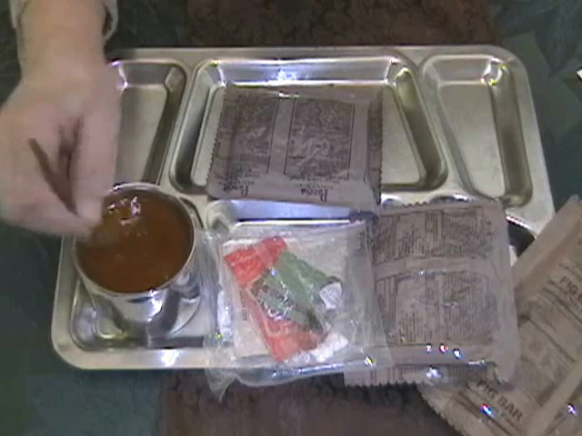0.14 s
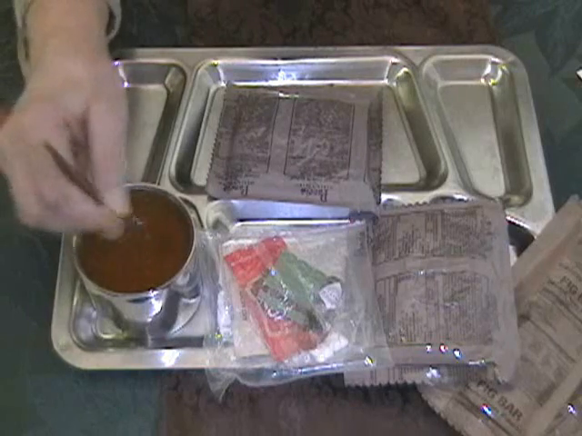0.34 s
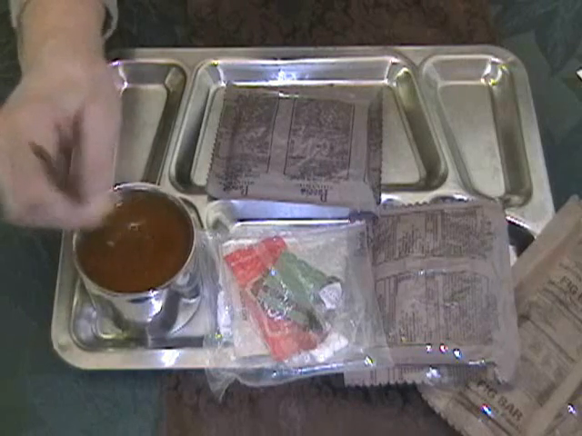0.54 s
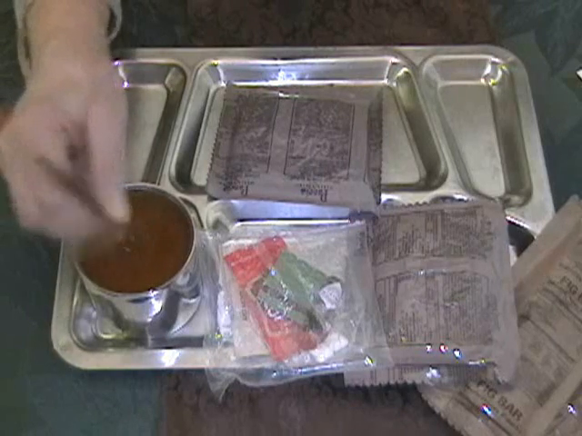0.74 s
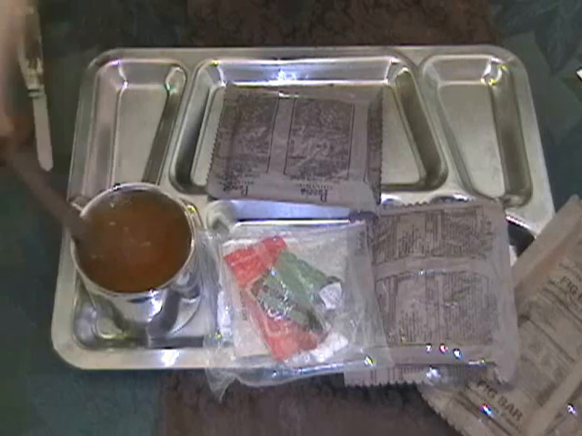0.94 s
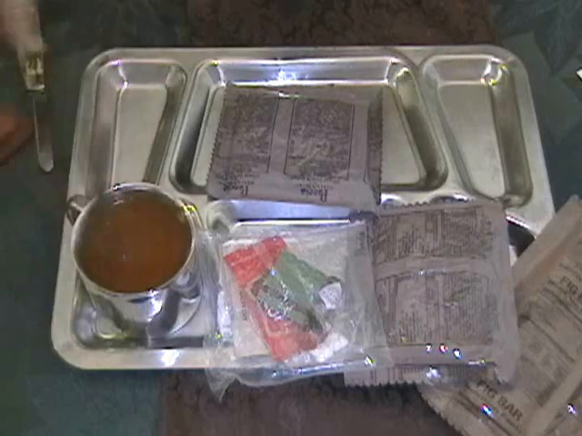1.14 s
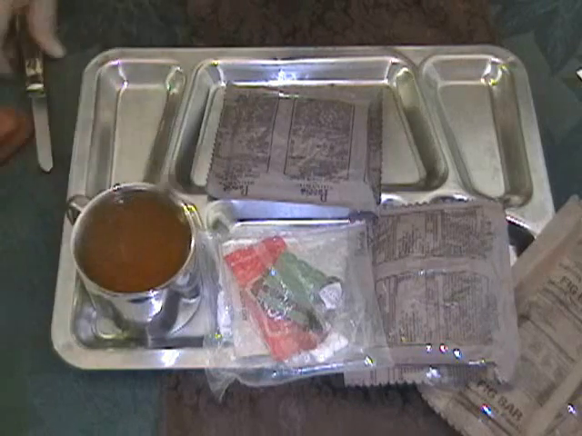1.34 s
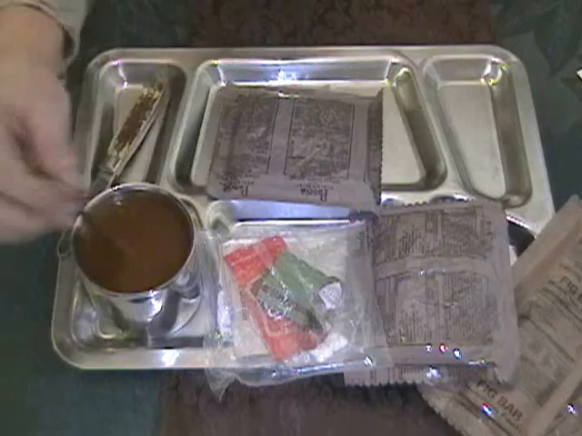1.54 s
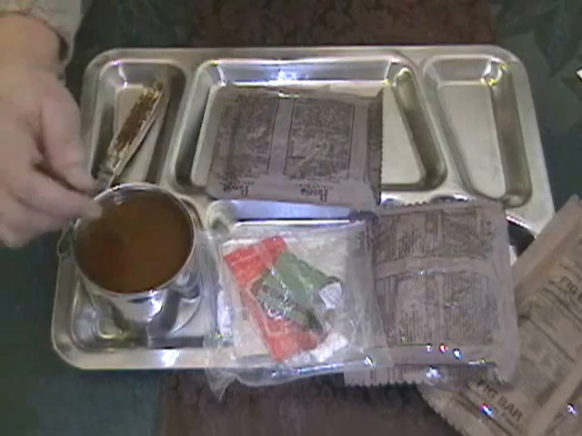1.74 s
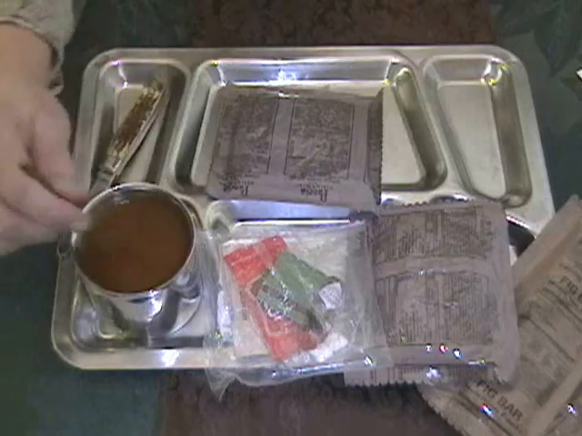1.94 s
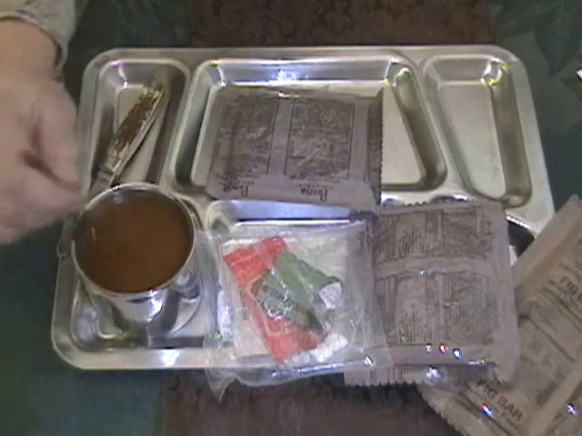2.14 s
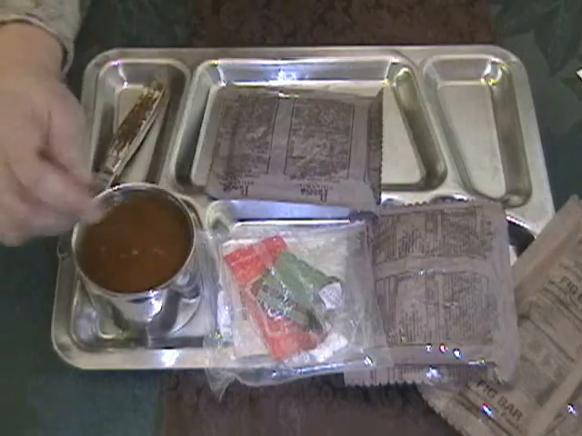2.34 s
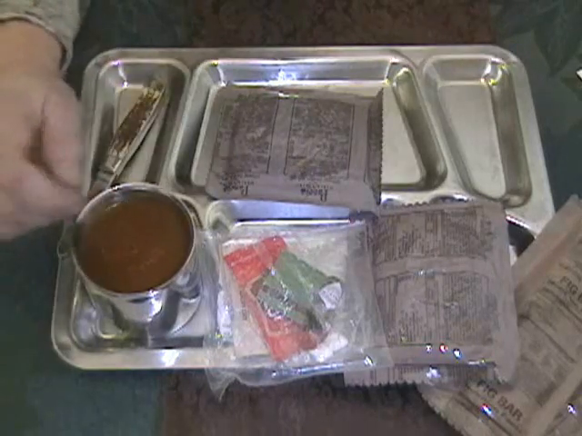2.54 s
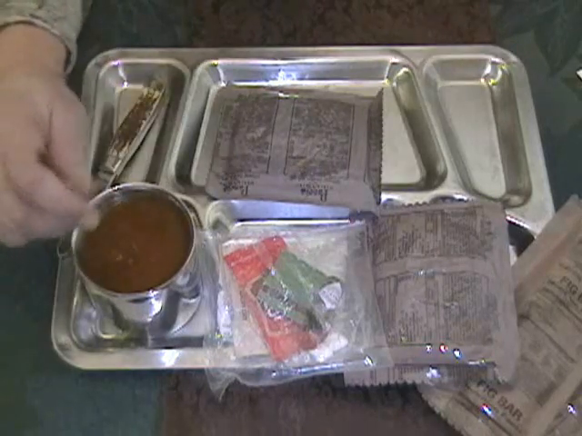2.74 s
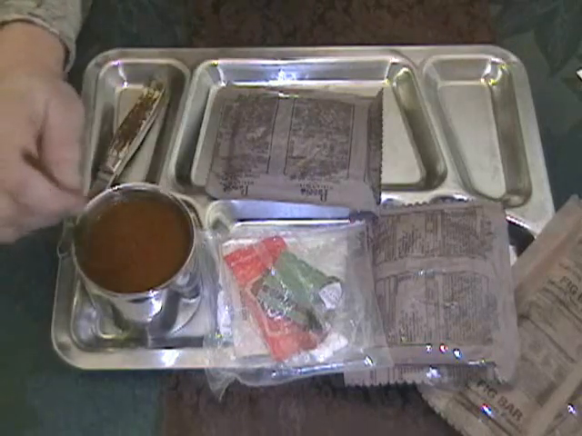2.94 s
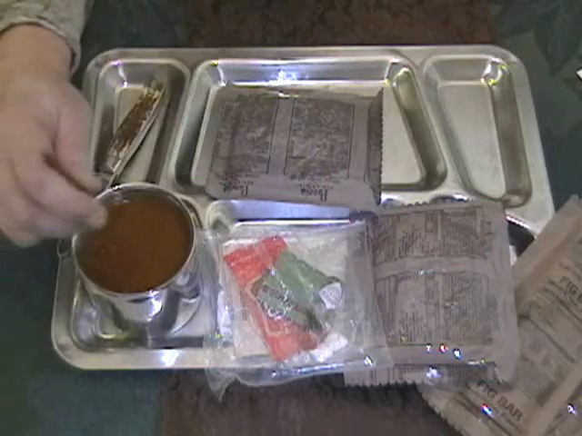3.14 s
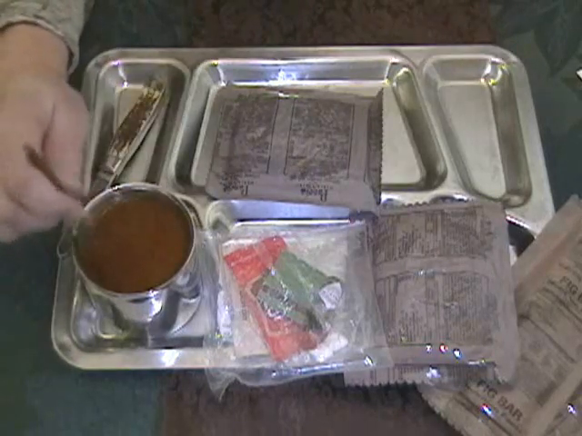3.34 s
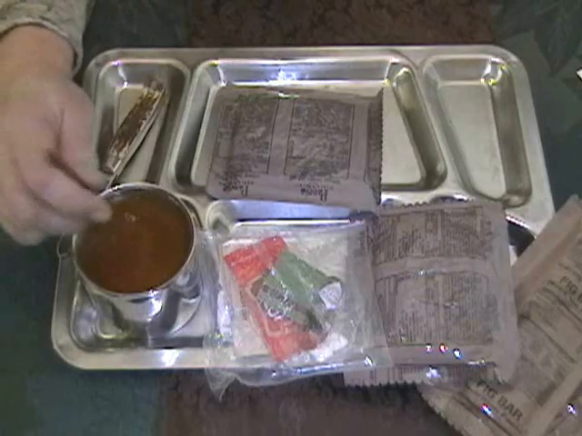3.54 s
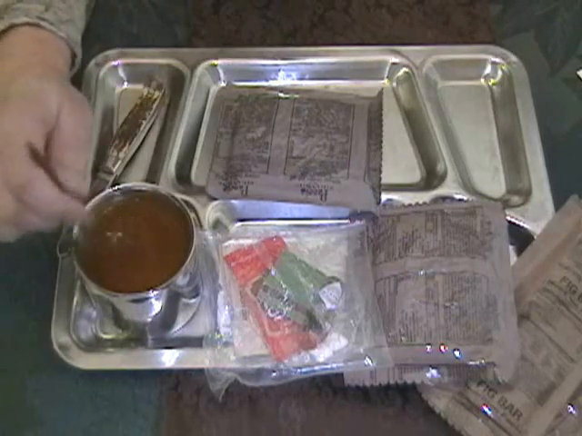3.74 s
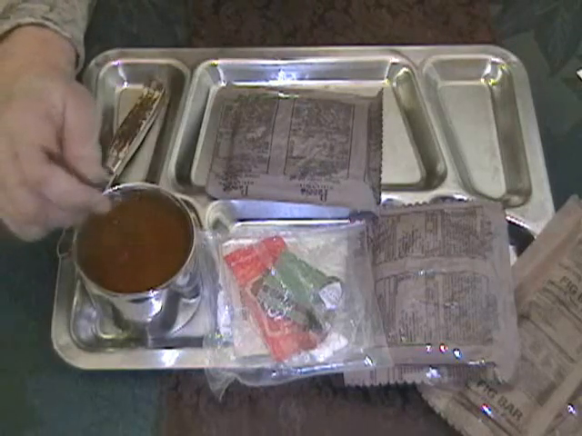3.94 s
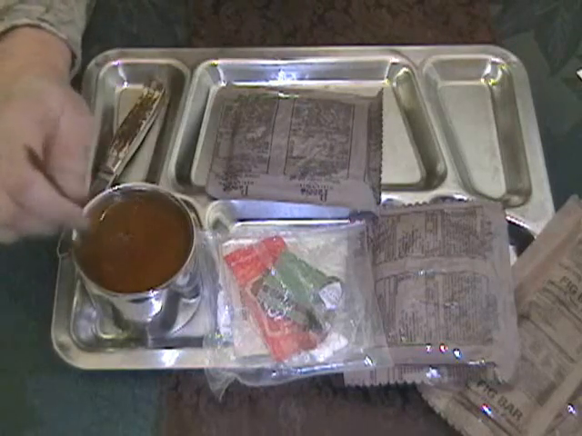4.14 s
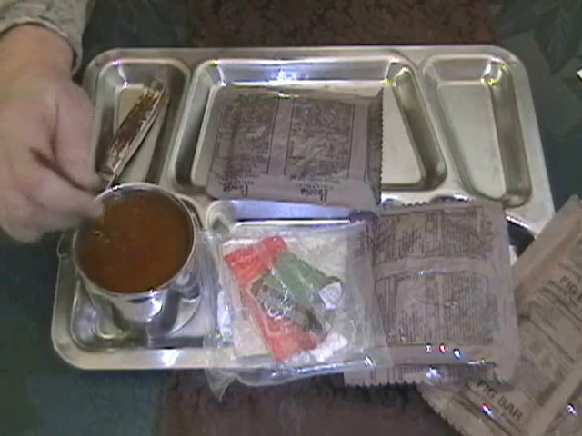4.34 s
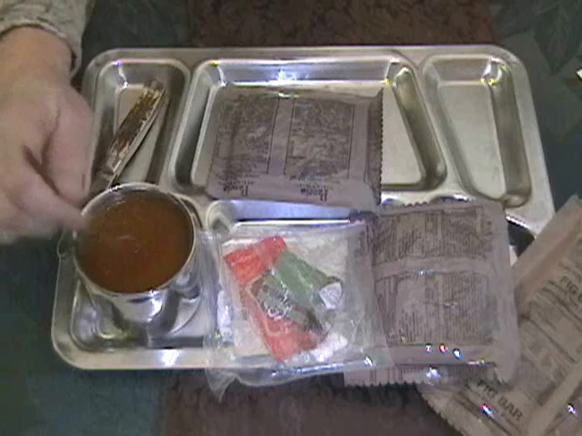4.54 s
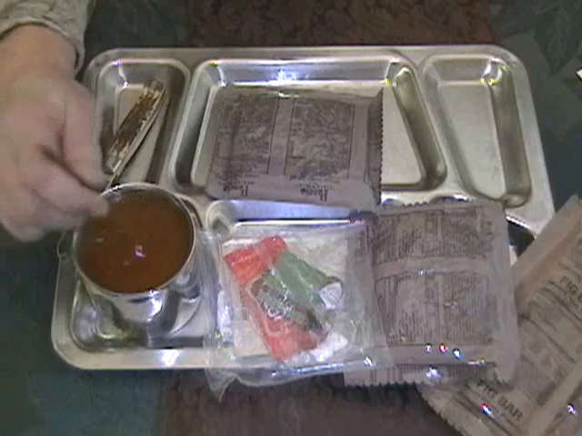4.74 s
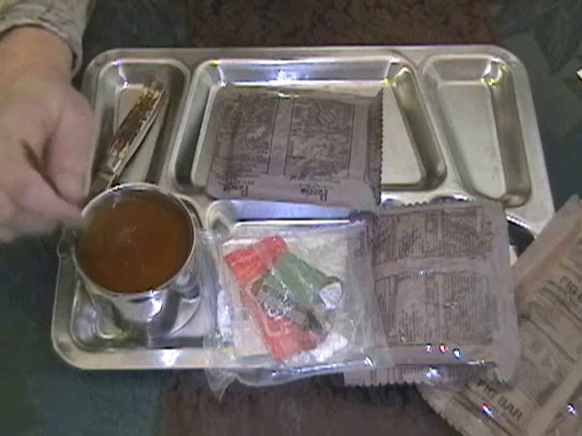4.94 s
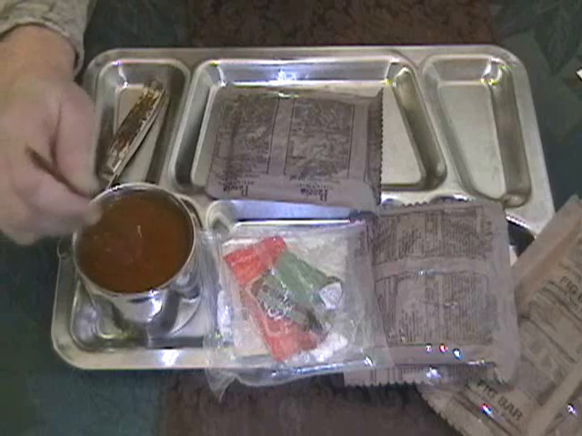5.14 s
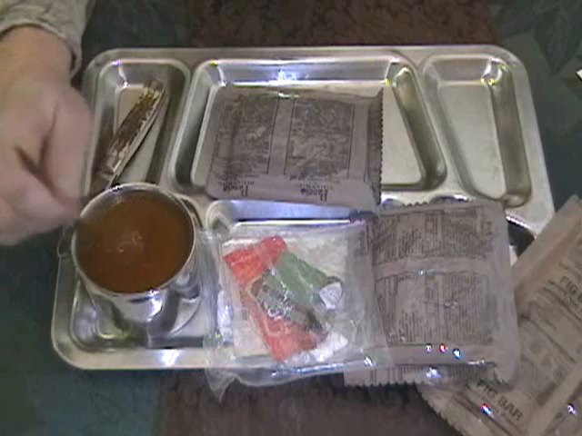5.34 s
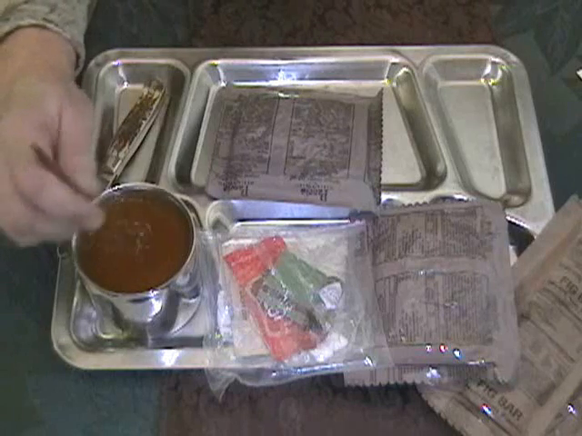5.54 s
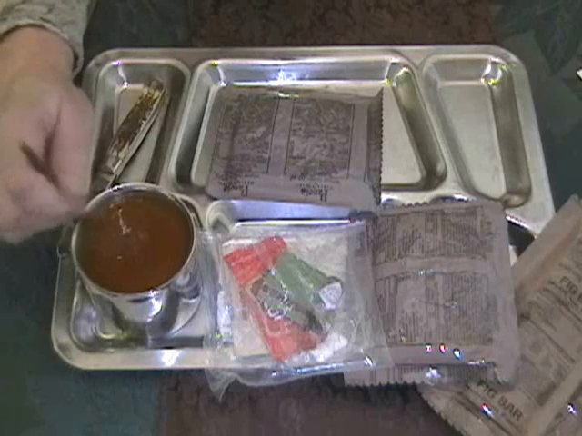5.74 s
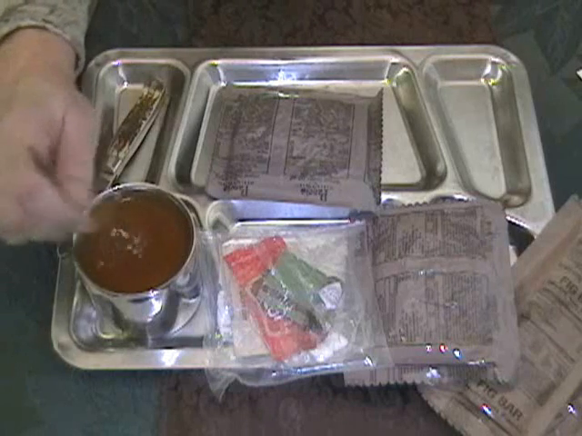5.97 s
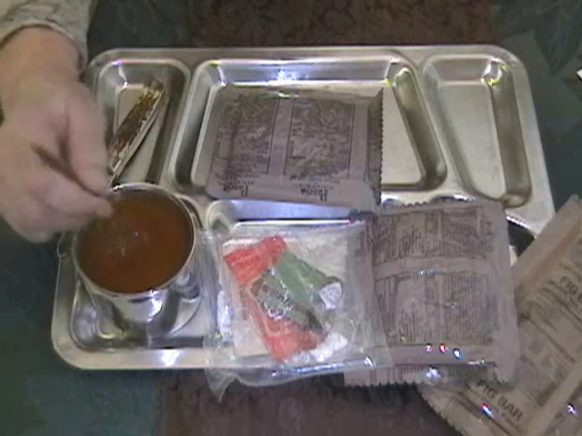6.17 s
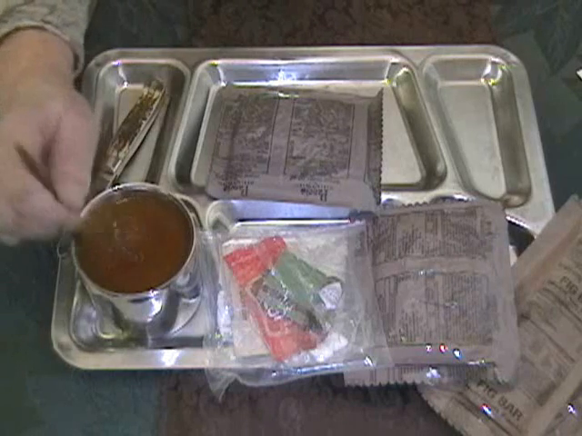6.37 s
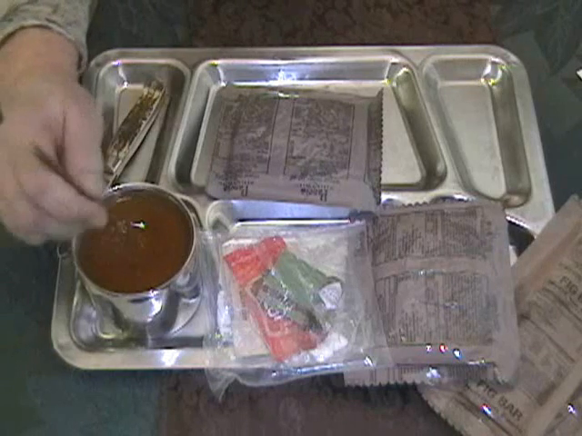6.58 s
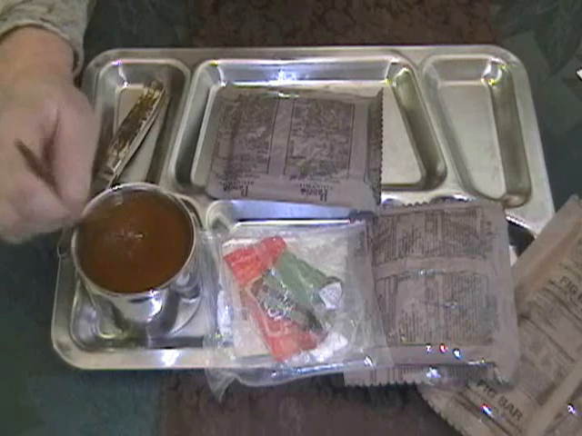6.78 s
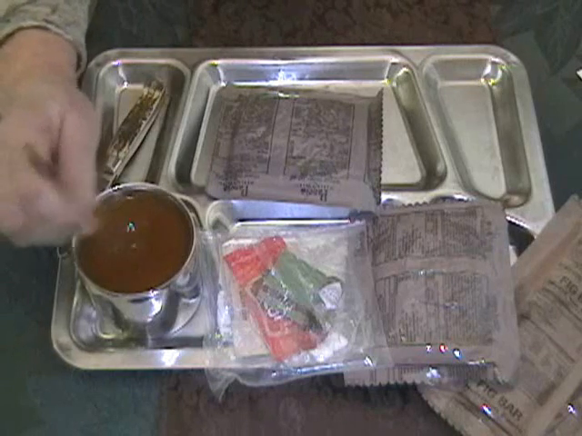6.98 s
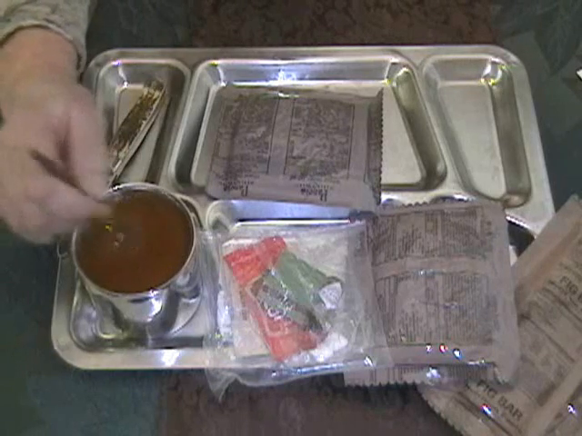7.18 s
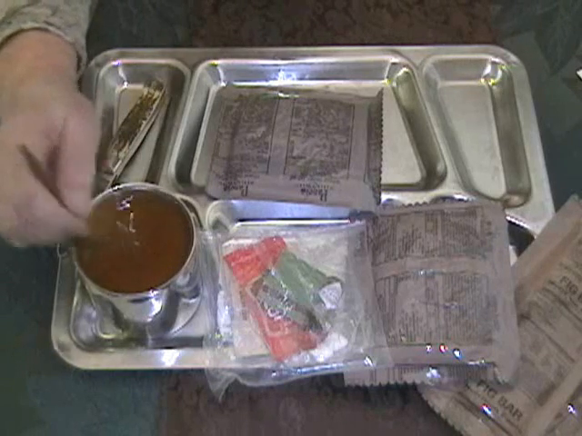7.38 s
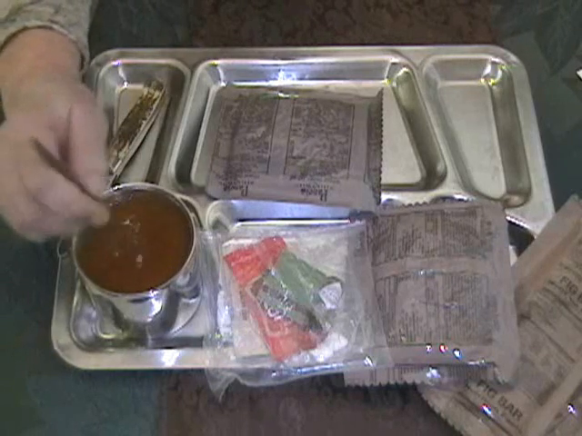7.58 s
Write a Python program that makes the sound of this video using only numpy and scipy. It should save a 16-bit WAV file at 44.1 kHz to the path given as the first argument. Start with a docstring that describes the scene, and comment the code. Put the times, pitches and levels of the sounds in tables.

```python
"""A steel spoon stirs a drink in a steel cup that stands on a metal tray, in a small room.
Each knock or tap is a burst of noisy contacts ringing the cup, spoon and tray; each scrape is a stream
of stick-slip impulses through the same steel. Early on the spoon is let go, clatters and slides round
the rim, and is picked up again. The drink adds a soft rising resonance ahead of the slow scrapes.
A faint hum and filtered room noise lie underneath."""
import sys
import numpy as np
from scipy import signal
from scipy.fft import rfft, irfft, next_fast_len
from scipy.io import wavfile
from scipy.ndimage import uniform_filter1d

SR = 44100
rng = np.random.default_rng(int(sys.argv[2]) if len(sys.argv) > 2 else 0)


def pcm_store(signal):
    """Save signal as 16-bit PCM."""
    levels = np.round(np.clip(np.atleast_2d(signal), -1, 1) * 32767)
    wavfile.write(sys.argv[1], SR, levels.astype(np.int16).T)


N = 335585
T = np.arange(N) / SR
RING_T = T[:2 ** 15]

# brisk rounds, in which the bowl knocks the wall, skids along it and rebounds:
# (knock time [s], knock level [dB], brightness [dB], rebound time [s], rebound level [dB])
BRISK_ROUNDS = [(0.177, -42, 1.5, 0.286, -40), (0.527, -37.5, 3.5, 0.613, -33.5),
                (4.902, -39, 2.5, 4.974, -40.5), (5.27, -40.5, 0, 5.312, -37),
                (5.662, -35, 0.5, 5.712, -39), (6.034, -33.5, 1, 6.106, -40.5),
                (6.39, -36, -1, 6.438, -35.5), (6.763, -38.5, -2.5, 6.792, -36),
                (7.083, -34.5, -1.5, 7.154, -44), (7.402, -36, -3.5, 7.47, -45.5)]
# slow rounds, in which the spoon touches the wall, glides and presses into a scrape:
# (touch time [s], touch level [dB], brightness [dB], middle of scrape [s], scrape length [s],
#  scrape level [dB])
SLOW_ROUNDS = [(1.903, -44, 0, 2.075, .085, -39), (2.43, -44, 0, 2.498, .09, -42.5),
               (2.79, -40.5, 3.5, 2.953, .05, -37.5), (3.159, -48, 3, 3.387, .015, -36.5),
               (3.635, -43, -2, 3.828, .05, -41), (4.088, -32, -5, 4.22, .035, -44.5),
               (4.475, -44.5, 5, 4.617, .025, -35), (5.591, -48, 2, 5.632, .02, -46)]
# stray taps of the bowl on the wall: (time [s], level [dB], brightness [dB])
TAPS = [(0.0, -46.5, -11), (1.715, -48.5, 0), (1.853, -52, 1), (2.69, -44.5, 3), (2.895, -46, 0),
        (3.174, -47, 6), (3.213, -39.5, -1.5), (3.422, -41, 5), (3.793, -39.5, 0.5), (4.248, -40.5, -11),
        (4.495, -35, -3), (4.885, -43, -1), (5.036, -40, -7), (5.426, -52, -7), (5.949, -60, -3.5),
        (6.678, -44.5, 2), (7.212, -52, 2)]
# the handle touches the rim and rings, with little thud: (time [s], level [dB], brightness [dB])
PINGS = [(1.628, -42, -4), (2.098, -31.5, -6), (2.972, -34.5, 1), (5.748, -41, -9), (5.786, -40.5, 0)]
# the spoon is let go and clatters against the rim: (time [s], level [dB], brightness [dB])
CLATTER = [(0.843, -31, -9.5), (0.88, -23.5, -2.5), (0.931, -41, 3.5), (0.969, -35.5, 5.5),
           (0.988, -38, 4.5), (1.124, -38.5, 2.5), (1.153, -37, -3), (1.278, -40.5, 1.5), (1.31, -46.5, 5),
           (1.329, -45, 5), (1.351, -45, 8), (1.371, -42, -2), (1.49, -43, -1.5)]

# tone of each kind of blow: (low against middle [dB], treble against middle [dB], freedom of ring [dB],
#  chatter time [s], chatter over first touch [dB])
KNOCK_TONE = (0.5, 3, -3, 0.0028, 3)
REBOUND_TONE = (-7, -2.5, 4.5, 0.003, 3)
TAP_TONE = (-8, 2.3, 1.5, 0.0038, 5)
PING_TONE = (-18, 0, 5, 0.004, 5)
CLATTER_TONE = (-5.5, 6.24, 7, 0.0017, 4)
# tone of each kind of rubbing: (low against middle [dB], cup ring [dB], damping of the cup [factor])
SKID_TONE = (-1, -1, 2.1)
SCRAPE_TONE = (-7.5, -2, 2.5)
SLIDE_TONE = (-6, 0, 2.1)

# modes of the filled cup, before scatter and contact damping: (frequency [Hz],
#  level when struck near the rim [dB], level when struck low on the wall [dB], 60 dB decay [s])
CUP_MODES = [(628, -5.5, -3.5, 0.078), (845, -2.5, 0, 0.32), (1190, -5, -14.5, 0.94),
             (1399, -12.5, -2, 0.073), (1506, -12, -7, 0.16), (1718, 4, -2.5, 0.46), (2433, 5, -13.5, 0.14),
             (2616, -5.5, 0.5, 0.42), (2802, -17.5, -1, 0.16), (2960, -6, -15, 0.59),
             (5310, -5.5, -13, 0.22), (5704, -10, 6, .08), (5780, -10, -3.5, 0.17), (6220, -1, -3.5, 0.13),
             (7630, -1, -17, 0.097)]
# the spoon's bending note between the fingers, before scatter: (time [s], frequency [Hz], level [dB])
GRIPPED_SPOON = [(1.5, 2350, -12), (1.7, 2057, 11.5), (2.109, 2091, 13), (2.5, 2115, 3.5),
                 (4.09, 2038, 12.5), (4.3, 2047, -0.5), (5.299, 2035, 4), (7.6, 1988, 9)]
# modes of the spoon loose against the rim, before scatter and contact damping:
# (frequency [Hz], level [dB], 60 dB decay [s])
LOOSE_SPOON_MODES = [(791.4, 0.5, 0.23), (2300, 1, 0.16), (2350, -4.5, .2), (4380, -1, .22),
                     (6860, 5, 0.033), (7140, -1.5, .08)]
# spectrum of the crowded, quickly damped modes of cup and tray: (frequency [Hz], relative level [dB])
TRAY_SPECTRUM = [(380, -10.5), (580, 2), (850, 6), (1100, 0.5), (1430, 7.5), (1800, -2.5), (2020, 2),
                 (2300, -2), (2750, 4.5), (3200, 0.5), (4600, 0), (5800, 6.5), (8000, -2), (15500, -15.5)]
# stereo balance: (frequency [Hz], left minus right [dB])
STEREO_BALANCE = [(200, 4), (700, 5.3), (1500, 4), (3000, 2.8), (10000, 0.8)]
# spectrum of the room's stereo difference signal: (frequency [Hz], relative level [dB])
ROOM_WIDTH = [(200, 13), (700, 2.5), (1500, -2), (5000, -1.5), (10000, -24)]
# spectrum of the room noise: (frequency [Hz], relative level [dB])
AIR_SPECTRUM = [(25, -18), (70, -6.5), (180, 1.5), (350, -0.5), (1000, -2.5), (2900, -3), (3500, -10.5),
                (11000, -14), (15500, -21.5)]
# movement of the background: (time [s], low room noise level [dB], hum level before panning [dB])
BACKGROUND_LEVELS = [(0, -53.5, -61.5), (1.59, -53, -62), (1.62, -61, -78.5), (4, -58.5, -80.5),
                     (6, -56, -73), (7.6, -54, -75.5)]

# blows and rubs that begin between these times ring like a loose spoon
LOOSE_FROM_S, LOOSE_TO_S = 0.83, 1.6
# a skid starts this far from its knock level and eases off until the rebound
SKID_DB, SKID_EASE_DB_PER_S, SKID_TREBLE_DB = -8, -55, -3
# a slow round glides lightly, then swells, holds and lets go
GLIDE_DB, SCRAPE_TREBLE_DB, LET_GO_DB = -57, 0, -25
SWELL_S, RELEASE_S = 0.065, 0.045
# the loose spoon slides and slowly settles until it is picked up
SLIDE_DB, SETTLE_DB_PER_S, SLIDE_TREBLE_DB, PICKED_UP_S = -41, -4.5, -3.5, 1.69
# each clatter kicks the slide into a louder, brighter rattle
KICK_DB, KICK_TREBLE_DB, KICK_S = 4, 4, 0.1
# resonance of the drink; the lead counts back from the middle of the scrape
SWIRL_LEAD_S, SWIRL_S, SWIRL_DB = 0.125, 0.1, -54.5
SWIRL_FROM_HZ, SWIRL_TO_HZ, SWIRL_WIDTH_HZ = 620, 850, 28
HUM_HZ, TOP_HZ = 93.7, 15500
# crossovers between low, middle and treble
LOW_EDGE_HZ, TREBLE_EDGE_HZ = 1200, 3300
SPLITS = [signal.butter(4, hz, fs=SR, output="sos") for hz in (LOW_EDGE_HZ, TREBLE_EDGE_HZ)]


def knocks(ring_db=-6, low_t60=0.088, middle_t60=0.097, treble_t60=0.032):
    """A first touch and milliseconds of chatter excite a clack and pump up the ring, band by band."""
    out = np.zeros(N)
    attack = SR // 50
    for s, blow_db, bright_db, tone in blows():
        low_db, treble_db, free_db, chatter_s, chatter_db = tone
        levels = blow_db + np.array([low_db, 0, treble_db + bright_db])
        # cubed noise is spiky, like many small contacts
        bounce = np.exp(-(RING_T[:attack] / chatter_s - 1) ** 2)
        chatter = unit(rng.standard_normal(attack) ** 3 * bounce)
        force = undb(chatter_db) * chatter
        force[0] += 1  # the first touch
        build_up = 1 - np.exp(-RING_T / chatter_s)
        ring = undb(ring_db + free_db) * cup_ring(s) * build_up
        decays = (low_t60, middle_t60, treble_t60)
        for band, (db, t60) in enumerate(zip(levels, decays)):
            thud = signal.fftconvolve(unit(force), clack(t60))[:len(ring)]
            part = bands(thud + ring)[band]
            add(out, s, part * undb(db) / rms(part[:attack]))
    return out


def blows():
    """Every blow of the spoon as (time [s], level [dB], brightness [dB], tone)."""
    for s, db, bright_db, rebound_s, rebound_db in BRISK_ROUNDS:
        yield s, db, bright_db, KNOCK_TONE
        yield rebound_s, rebound_db, bright_db, REBOUND_TONE
    for rows, tone in ((SLOW_ROUNDS + TAPS, TAP_TONE), (PINGS, PING_TONE), (CLATTER, CLATTER_TONE)):
        for s, db, bright_db, *_ in rows:
            yield s, db, bright_db, tone


def cup_ring(s, damping=1, spoon_t60=0.14, scatter_db=3.0):
    """Decaying modes of cup and spoon; the spoon works near the rim at first, deeper once picked up."""
    near_rim = s < LOOSE_TO_S
    modes = [(hz, rim_db if near_rim else wall_db, t60) for hz, rim_db, wall_db, t60 in CUP_MODES]
    times, grip_hz, grip_db = np.transpose(GRIPPED_SPOON)
    modes.append((np.interp(s, times, grip_hz), np.interp(s, times, grip_db), spoon_t60))
    if is_loose(s):
        modes = modes + LOOSE_SPOON_MODES
    hz, db, t60 = np.transpose(modes)
    # sloshing shifts the modes a little, a spoon leaning on the rim shifts them more
    detune = 0.009 if is_loose(s) else 0.002
    hz = hz * (1 + detune * rng.standard_normal(len(hz)))
    # dividing by the root of the decay makes the levels compare energies
    size = undb(db + scatter_db * rng.standard_normal(len(hz))) / np.sqrt(t60)
    size = size * rng.choice([-1, 1], len(hz))
    impulse = 1.0 * (RING_T == 0)
    ring = 0
    for turn, radius, gain in zip(2 * np.pi * hz / SR, fade(1 / SR, t60 / damping), size):
        resonator = [1, -2 * radius * np.cos(turn), radius ** 2]
        ring = ring + signal.lfilter([gain, 0, -gain], resonator, impulse)
    return unit(ring)


def clack(t60, lowest_hz=310):
    """Crowded modes of cup and tray as fading noise, with little bass."""
    t = RING_T[:2 ** 12]
    burst = colour(rng.standard_normal(len(t)), TRAY_SPECTRUM) * fade(t, t60)
    burst = signal.lfilter(*signal.butter(2, lowest_hz, "high", fs=SR), burst)
    return np.pad(unit(burst), (0, len(RING_T) - len(t)))


def is_loose(s):
    """Whether the spoon rings as one out of the hand."""
    return LOOSE_FROM_S < s < LOOSE_TO_S


def scrapes():
    """The held spoon drags finely: it skids after each knock and bears down once in each slow round."""
    drag = catches(per_s=2200, grain_db=4.5, uneven_db=1.8)
    out = 0
    for s, knock_db, bright_db, rebound_s, _ in BRISK_ROUNDS:
        times = np.array([s, rebound_s])
        db = knock_db + SKID_DB + SKID_EASE_DB_PER_S * (times - s)
        out = out + rub(drag, times, db, SKID_TREBLE_DB + bright_db, SKID_TONE)
    for s, _, bright_db, press_s, length_s, press_db in SLOW_ROUNDS:
        start, end = press_s - length_s / 2, press_s + length_s / 2
        times = np.maximum(s, [s, start - SWELL_S, start, end, end + RELEASE_S])
        db = np.array([GLIDE_DB, GLIDE_DB, press_db, press_db, press_db + LET_GO_DB])
        out = out + rub(drag, times, db, SCRAPE_TREBLE_DB + bright_db / 2, SCRAPE_TONE)
    return out


def slide():
    """Between its clatters the loose spoon rattles round the rim, kicked up and then settling."""
    rattle = catches(per_s=550, grain_db=2.5, uneven_db=2.5)
    out = 0
    kicks = [s for s, *_ in CLATTER[1:]]
    for start, end in zip(kicks, kicks[1:] + [PICKED_UP_S]):
        times = np.linspace(start, end)
        kick = np.maximum(1 - (times - start) / KICK_S, 0)
        db = SLIDE_DB + SETTLE_DB_PER_S * (times - kicks[0]) + KICK_DB * kick
        treble_db = SLIDE_TREBLE_DB + KICK_TREBLE_DB * kick
        out = out + rub(rattle, times, db, treble_db, SLIDE_TONE)
    return out


def catches(per_s, grain_db, uneven_db):
    """Stick-slip impulses at random times, their sizes scattered and swelling in small clusters."""
    clusters = uniform_filter1d(rng.standard_normal(N), size=200)
    grain = np.clip(rng.standard_normal(N), -2, 2)
    size_db = grain_db * grain + uneven_db * clusters / rms(clusters)
    slips = rng.random(N) < per_s / SR
    return slips * rng.choice([-1, 1], N) * undb(size_db)


def rub(friction, times, db, treble_db, tone):
    """Friction under a changing pressure sounds the steel; the contact damps the cup."""
    low_db, ring_db, damping = tone
    out = np.zeros(N)
    span = slice(int(times[0] * SR), int(times[-1] * SR))
    steel = clack(t60=0.022) + undb(ring_db) * cup_ring(times[0], damping)
    for band, levels in enumerate((db + low_db, db, db + treble_db)):
        pressure = undb(np.interp(T[span], times, levels))
        part = bands(signal.fftconvolve(friction[span] * pressure, steel))[band]
        # the band carries the energy of its pressure curve
        add(out, times[0], unit(part) * np.linalg.norm(pressure))
    return out


def swirls():
    """Ahead of each slow scrape, a soft, rough resonance rises as the spoon pushes the drink round."""
    out = np.zeros(N)
    t = T[:SR // 4]
    hz = np.interp(t, [0, SWIRL_S], [SWIRL_FROM_HZ, SWIRL_TO_HZ])
    glide = np.exp(2j * np.pi * np.cumsum(hz) / SR)
    swell = np.sqrt(np.abs(np.sin(np.pi * np.minimum(t / SWIRL_S, 1))))
    smoothing = np.exp(-np.pi * SWIRL_WIDTH_HZ / SR)
    for s, _, _, press_s, *_ in SLOW_ROUNDS:
        # slow complex noise on the gliding tone makes a narrow, rough band
        noise = rng.standard_normal((len(t), 2)) @ [1, 1j]
        flutter = signal.lfilter([1], [1, -smoothing], noise)
        swirl = np.real(flutter * glide) * swell
        level = undb(SWIRL_DB) / rms(swirl[t < SWIRL_S])
        add(out, max(s, press_s - SWIRL_LEAD_S), swirl * level)
    return out


def room(x, t60=0.36, wet_db=-11, side_db=-11, build_s=0.0054):
    """Direct sound and a short, even tail of fading noise; the cup stands to the left."""
    envelope = fade(RING_T, t60) * (1 - np.exp(-RING_T / build_s))
    tail, across = (unit(rng.standard_normal(len(RING_T)) * envelope) for _ in range(2))
    size = next_fast_len(N + len(RING_T), real=True)
    spectrum = rfft(x, size)
    mid = irfft(spectrum * (1 + undb(wet_db) * rfft(tail, size)), size)
    side = undb(side_db) * colour(irfft(spectrum * rfft(across, size), size), ROOM_WIDTH)
    channels = []
    for sign in (1, -1):  # left, right
        balance = [(hz, sign * db / 2) for hz, db in STEREO_BALANCE]
        channels.append(colour(mid + sign * side, balance)[:N])
    return np.array(channels)


def background(side_db=-5, hum_pan_db=2, hiss_db=-62):
    """Steady hiss from noise, with low room noise and a sine hum that drop abruptly and partly creep back."""
    s, air_db, hum_db = np.transpose(BACKGROUND_LEVELS)
    size = next_fast_len(N, real=True)
    mid, side = (colour(rng.standard_normal(size), AIR_SPECTRUM)[:N] for _ in range(2))
    sign = np.array([[1], [-1]])  # left, right
    air = (mid + sign * undb(side_db) * side) / rms(mid)
    low, middle, treble = bands(air)
    rumble = low * undb(np.interp(T, s, air_db))
    hiss = (middle + treble) * undb(hiss_db)
    hum = np.sqrt(2) * np.sin(2 * np.pi * HUM_HZ * T) * undb(sign * hum_pan_db)
    return rumble + hiss + hum * undb(np.interp(T, s, hum_db))


def undb(db):
    """Decibels to gain."""
    return 10 ** (np.asarray(db) / 20)


def unit(x):
    """Scale to an energy of one."""
    return x / np.sqrt(np.sum(x ** 2))


def rms(x):
    """Root mean square, kept above zero."""
    return np.sqrt(np.mean(x ** 2)) + 1e-12


def colour(x, points):
    """Shape a spectrum by (frequency [Hz], level [dB]) points."""
    hz, db = np.transpose(points)
    f = np.linspace(1, SR / 2, len(x) // 2 + 1)
    return irfft(rfft(x) * undb(np.interp(np.log(f), np.log(hz), db)), len(x))


def bands(x):
    """Low, middle and treble parts that add up to the whole."""
    # the tiny offset keeps the filters out of denormal numbers
    low, body = (signal.sosfiltfilt(split, x + 1e-18, padtype=None) for split in SPLITS)
    return low, body - low, x - body


def fade(t, t60):
    """Decay by 60 dB in t60 seconds."""
    return np.exp(-np.log(1000) * t / t60)


def add(track, s, x):
    """Mix a sound in at a time in seconds, trimmed to the track."""
    start = int(s * SR)
    x = x[max(-start, 0):N - start]
    start = max(start, 0)
    track[start:start + len(x)] += x


def scene():
    """Knocks, scrapes, the loose spoon and the moving drink in the room, over its background."""
    return room(knocks() + scrapes() + slide() + swirls()) + background()


def record(dry, low_cut_hz=65):
    """The recorder thins the deep bass and cuts the top steeply."""
    thin = signal.sosfilt(signal.butter(2, low_cut_hz, "high", fs=SR, output="sos"), dry)
    return signal.sosfilt(signal.ellip(8, 0.2, 70, TOP_HZ, fs=SR, output="sos"), thin)


dry = scene()
out = record(dry)
pcm_store(out)
```